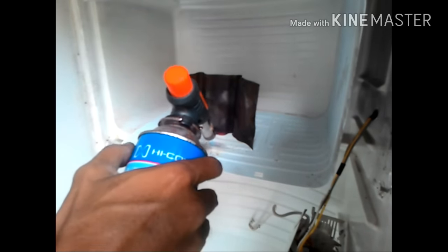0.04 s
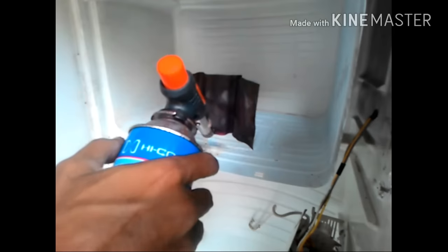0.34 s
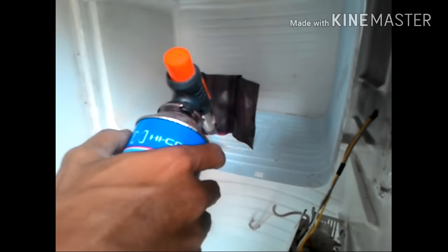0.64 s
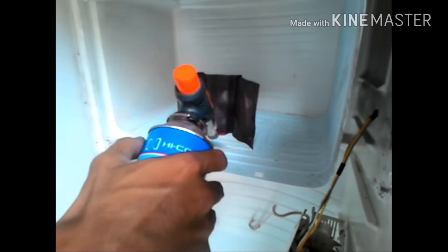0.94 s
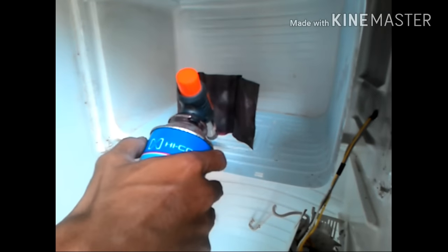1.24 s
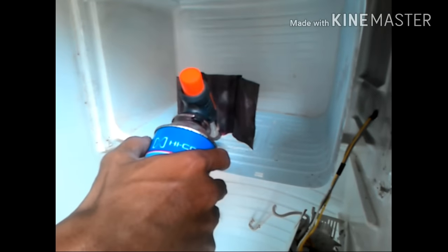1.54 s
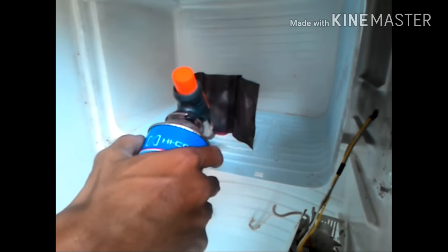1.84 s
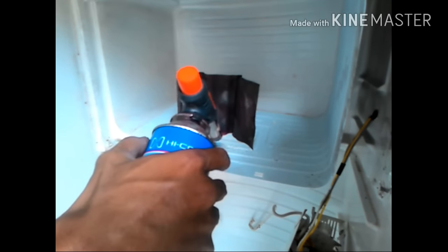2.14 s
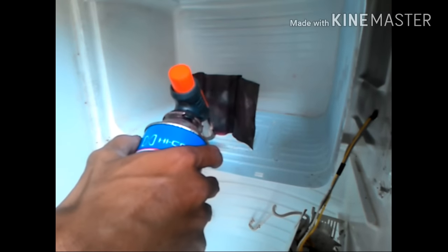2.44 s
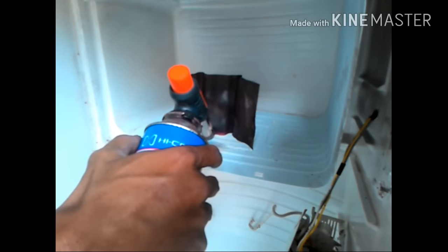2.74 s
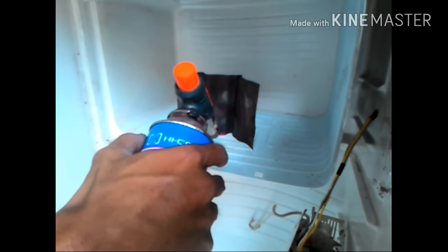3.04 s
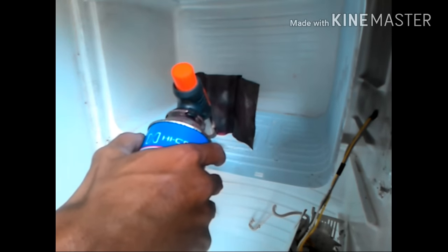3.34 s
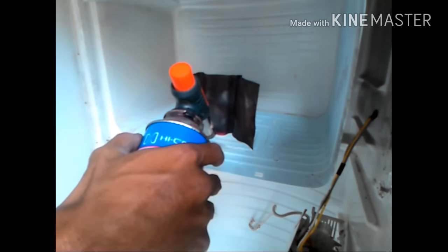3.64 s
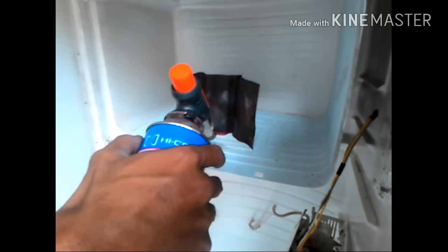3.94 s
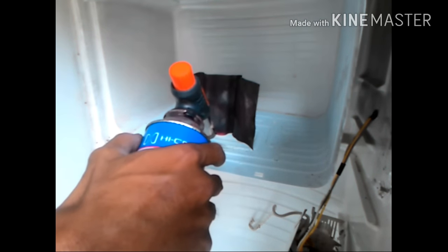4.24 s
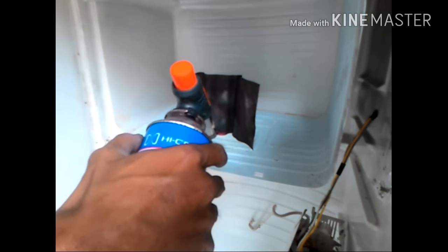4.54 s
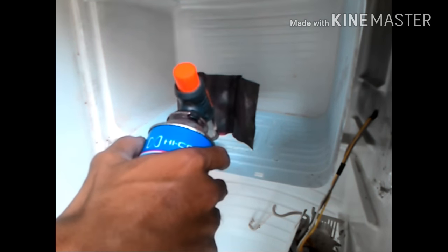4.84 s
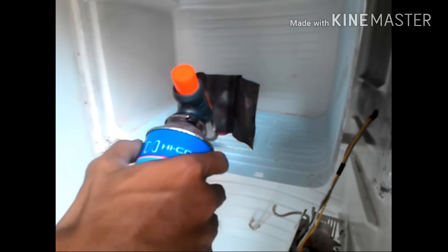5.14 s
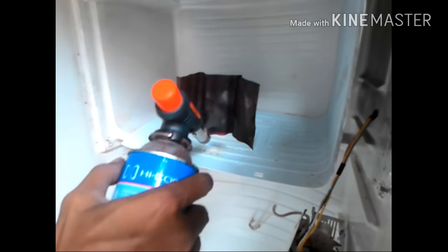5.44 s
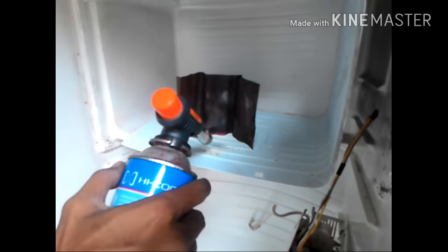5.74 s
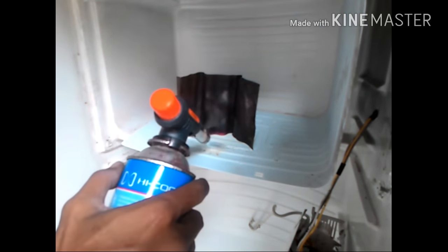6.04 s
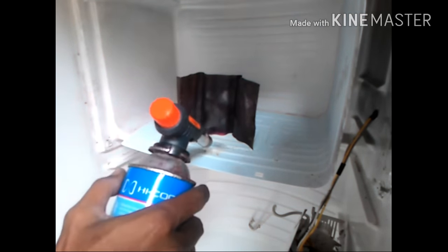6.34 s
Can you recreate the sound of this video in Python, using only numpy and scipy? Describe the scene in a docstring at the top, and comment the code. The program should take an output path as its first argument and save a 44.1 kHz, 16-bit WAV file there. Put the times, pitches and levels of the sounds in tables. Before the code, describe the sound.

A handheld gas torch hisses steadily up close, its flame flaring into short, hollow, fluttering roars against metal inside a refrigerator.

```python
"""Butane torch inside an empty refrigerator

A handheld torch heats a thin metal patch, close to a stereo camera's two microphone ports.
The gas jet hisses steadily through the burner tube, its colour shifting as the hand sways.
The flame flares into a roar on the metal and rings the air modes of the plastic cabinet,
with hollow puffs and a faint rumble beneath. Near the end the torch is lowered."""
import sys
import numpy as np
from scipy import signal
from scipy.fft import rfft, irfft, next_fast_len
from scipy.io import wavfile
from scipy.ndimage import map_coordinates

SR = 44100
rng = np.random.default_rng(int(sys.argv[2]) if len(sys.argv) > 2 else 0)


def transcribe(u):
    """Save the signal u as a 16-bit wav file named by the first command-line argument.

    u: samples, shape (n,) or (channels, n), limited to [-1, 1]; the rate is SR.
    q: integer samples, one column per channel.
    """
    v = np.clip(np.atleast_2d(u).T, -1, 1)
    q = np.round(v * 32767).astype(np.int16)
    wavfile.write(sys.argv[1], SR, q)


N = 290178
TIME = np.arange(N) / SR
FFT_SIZE = next_fast_len(N + 8192)
FREQ = np.fft.rfftfreq(FFT_SIZE, 1 / SR) + 1e-3

# hollow puffs of the flame: t/s, swell width/s, f/Hz, level/dB
PUFF_NOTES = [(0.955, 0.022, 109.6, -28), (1.039, 0.014, 234.6, -17), (1.111, .018, 236, -22),
              (1.25, 0.025, 232.6, -21), (1.45, 0.041, 115.5, -23), (1.336, 0.013, 330, -23),
              (2.475, 0.014, 310, -21), (2.524, 0.02, 164, -17.5), (2.65, 0.011, 105.8, -25.5),
              (2.77, .022, 240, -20), (3.175, .022, 110.3, -25), (3.292, 0.027, 162, -23),
              (3.895, 0.021, 235.5, -26.5), (4.042, .018, 437, -31), (4.055, 0.019, 266, -17),
              (4.1, 0.01, 252, -20), (4.446, 0.018, 270, -34), (5.617, 0.023, 255, -23),
              (5.22, 0.017, 103.8, -32.5), (5.745, 0.019, 247, -27), (5.993, 0.054, 251, -33),
              (6.19, 0.012, 110, -27), (6.236, 0.064, 255, -25)]


def amp(db):
    """Decibels to gain."""
    return 10 ** (np.asarray(db) / 20)


def unit(x):
    """x at rms 1."""
    return x / np.sqrt(np.mean(x ** 2) + 1e-20)


def curves(rows):
    """One automation curve for each column after the time."""
    times, *columns = np.transpose(rows)
    return [np.interp(TIME, times, column) for column in columns]


def swell(at_s, width_s):
    """A bell-shaped rise and fall; width_s is its standard deviation."""
    return np.exp(-.5 * np.minimum(np.abs(TIME - at_s) / width_s, 10) ** 2)


def wobble(rate):
    """A smooth random curve, rate knots a second."""
    coarse = TIME[::32]
    drift = map_coordinates(rng.standard_normal(4096), [coarse * rate], mode="wrap")
    return np.interp(TIME, coarse, drift)


def white(size=len(FREQ)):
    """Complex white noise, by default one full spectrum of it."""
    return rng.standard_normal(size) + 1j * rng.standard_normal(size)


def band(low_hz, high_hz, order):
    """Gain of a band-pass; order is the steepness of its (lower, upper) edge."""
    return ((1 + (low_hz / FREQ) ** (2 * order[0])) * (1 + (FREQ / high_hz) ** (2 * order[1]))) ** -.5


def bell_eq(x, hz, width_hz, db):
    """Boost or cut one band of x along a curve in dB."""
    bell = 2 ** -(2 * (FREQ - hz) / width_hz) ** 2
    part = irfft(rfft(x, FFT_SIZE) * bell, FFT_SIZE)[:, :N]
    return x + (amp(db) - 1) * part


def crossfade(a, b, share):
    """Equal-power fade from a (share 0) to b (share 1)."""
    return np.sqrt(1 - share) * a + np.sqrt(share) * b


def rush(colour, diffuse_db, lag_ms):
    """Stereo noise of rms 1: a direct part that reaches the left port late, and a diffuse part."""
    hz, db = np.transpose(colour)
    tone = amp(np.interp(np.log(FREQ), np.log(hz), db))
    delay = np.exp(-2j * np.pi * FREQ * lag_ms / 1000)
    direct = white()
    pair = np.array([direct * delay, direct]) + amp(diffuse_db) * np.array([white(), white()])
    return unit(irfft(pair * tone, FFT_SIZE)[:, :N])


def resonate(modes, drive):
    """Turbulence of colour drive excites modes, each with its own stereo level and phase; rms 1."""
    hz, width, left_db, right_db, phase = np.transpose(modes)
    f = FREQ[:, None]
    power = 1 / (1 + ((hz ** 2 - f ** 2) / (f * width)) ** 2) ** 2
    left_power, right_power = power @ amp(left_db) ** 2, power @ amp(right_db) ** 2
    cross_power = power @ (amp(left_db + right_db) * np.exp(1j * phase))
    # the right port shares part of the left port's sound; the rest is its own
    shared = cross_power / np.sqrt(left_power)
    own = np.sqrt(np.abs(right_power - np.abs(shared) ** 2))
    common = white()
    pair = np.array([np.sqrt(left_power) * common, shared * common + own * white()])
    return unit(irfft(pair * drive, FFT_SIZE)[:, :N])


def beamed(hz, width_hz, left_db, right_db, phase):
    """A narrow, noisy ring that follows the curve hz and reaches the ports at unequal level and phase."""
    eddies = signal.sosfilt(signal.butter(2, width_hz / 2, fs=SR, output="sos"), white(len(hz)))
    ring = eddies / np.std(eddies.real) * np.exp(2j * np.pi * np.cumsum(hz) / SR)
    return np.real([amp(left_db) * ring, amp(right_db) * np.exp(1j * phase) * ring])


def sway(x, depth_db, width_hz, life_s):
    """Standing waves shift as the hand sways: bands cancel deeply but swell only a little; rms 1."""
    hz, times, spectra = signal.stft(x, SR, nperseg=2048)
    grid = np.meshgrid(hz / width_hz, times / life_s, indexing="ij")
    field = map_coordinates(rng.standard_normal((512, 128)), grid, mode="wrap")
    gain = amp(depth_db * np.minimum(field, np.tanh(field)))
    # hold each port's total power even while its colour moves
    colour = np.mean(np.abs(spectra) ** 2, axis=2, keepdims=True)
    total = np.sum(colour * gain ** 2, axis=1, keepdims=True) / np.sum(colour, axis=1, keepdims=True)
    _, swayed = signal.istft(spectra * gain / np.sqrt(total), SR, nperseg=2048)
    return unit(swayed[:, :N])


def rumble(pose, roar, still_db=-63, handling_db=-46, flare_db=-30, lumps_db=4):
    """A faint, lumpy low bed, stronger under flares and while the torch is lowered."""
    # rumble spectrum: f/Hz, relative level/dB
    colour = [(12, 3), (30, -39), (65, 14), (110, 1), (600, -7), (4000, -62)]
    gain = np.sqrt(amp(still_db) ** 2 + pose * amp(handling_db) ** 2 + (amp(flare_db) * roar) ** 2)
    return gain * amp(lumps_db * wobble(6.7)) * rush(colour, diffuse_db=-3, lag_ms=.05)


def wash(roar, flare_db=-17):
    """Soft air between roar and hiss: it grows as the jet spills past the patch, and with each flare."""
    # spectrum of the airy band: f/Hz, relative level/dB
    colour = [(300, -10), (1500, 10.5), (2200, 2.5), (2600, 11.5), (3150, 10), (3400, 20), (3700, -9.5),
              (4300, -56), (8000, -66)]
    # spill past the patch: t/s, level/dB
    spill = [(0, -41), (.15, -44), (.35, -37.5), (.48, -41), (.8, -30), (1.2, -35), (1.75, -44), (2.1, -42),
             (2.8, -39), (3.05, -45), (3.25, -37), (3.6, -42), (4.1, -40), (4.7, -45), (5.35, -41),
             (5.7, -31), (5.9, -38), (6.3, -31.5), (6.58, -33)]
    air = rush(colour, diffuse_db=-4.5, lag_ms=.22)
    air = sway(air, depth_db=5, width_hz=120, life_s=.1)
    return np.hypot(amp(curves(spill)[0]), amp(flare_db) * roar) * air


def whistle():
    """The burner tube's thin ring stands out on the right while aimed, and sinks as the aim drifts."""
    # pitch and level of the ring: t/s, f/Hz, level/dB
    ring_path = [(1.0, 4870, -43), (1.25, 4880, -24.5), (1.7, 4910, -21.5), (1.9, 4895, -25),
                 (2.2, 4925, -21), (2.45, 4895, -26), (2.7, 4865, -22.5), (3.1, 4915, -25),
                 (3.55, 4895, -27), (4.1, 4890, -24.5), (4.7, 4860, -46), (5.6, 4840, -38),
                 (5.8, 4840, -70)]
    hz, db = curves(ring_path)
    return amp(db) * beamed(hz, width_hz=70, left_db=-12, right_db=0, phase=-1.77)


def sizzle():
    """Lobes of the jet's beam sweep past the ports as the hand sways, each a narrow swell of noise."""
    # passing lobes: t/s, swell width/s, f/Hz, bandwidth/Hz, left/dB, right/dB, right phase lead/rad
    lobes = [(.05, 0.092, 4670, 80, -28, -31, 0), (0.253, 0.25, 8500, 180, -20, -42, -2.4),
             (0.448, .12, 4030, 69.6, -27, -34, -0.3), (0.756, 0.2, 5060, 120, -33, -32, -1.5),
             (0.78, .14, 8280, 180, -23.5, -37, 1.3), (.8, .17, 4230, 95, -28.5, -29, 0.96),
             (0.852, 0.18, 4610, 80, -32, -33, 0), (1.169, .12, 8360, 160, -28, -34, -1.6),
             (1.25, .13, 7800, 200, -36, -36, 1.3), (2.04, 0.089, 8410, 160, -23, -35, -1.3),
             (2.099, .13, 3920, 90, -42, -30.5, 0.92), (2.149, .1, 5080, 90, -33, -28, -0.73),
             (2.482, 0.098, 8710, 220, -20.5, -31, -1), (2.85, .12, 8430, 180, -24.5, -35, -1.2),
             (3.242, 0.13, 7920, 220, -23, -35, 1.7), (3.45, .15, 8380, 200, -25, -35, -1.8),
             (4.451, 0.16, 8680, 240, -25.5, -22, 0.86), (4.604, 0.37, 11150, 350, -40, -35, 0.4),
             (4.851, 0.4, 4756, 99, -25.5, -39, 0.84), (4.951, 0.38, 4930, 80, -23.5, -37, -1.6),
             (5.051, 0.2, 8630, 200, -23, -26, 0.89), (5.098, .25, 4106, 60, -27.5, -37, 0.57),
             (5.707, .09, 4060, 110, -26, -29, 1), (5.745, 0.13, 4660, 110, -32, -36, 1.8),
             (5.803, 0.12, 5100, 80, -30, -35.5, 0), (6.246, .2, 4820, 110, -26, -28, 2),
             (6.306, .1, 4020, 100, -22, -24, 0.5)]
    out = np.zeros((2, N))
    for at_s, width_s, hz, width_hz, left_db, right_db, phase in lobes:
        gain = swell(at_s, width_s)
        heard = np.flatnonzero(gain > .01)
        ring = beamed(np.full(len(heard), hz), width_hz, left_db, right_db, phase)
        out[:, heard] += gain[heard] * ring
    return out


def tube_hiss(pose, roar, level_db=-21.5, lowered_db=2.5, flare_boost=2.1):
    """Gas hisses through the burner tube; with the torch lowered, the hiss swells with each flare."""
    # hiss resonances with the torch held close, aimed at the patch and lowered:
    # f/Hz, bandwidth/Hz, relative left/dB, relative right/dB, right phase lead/rad
    close_modes = [(3709, 336, -12.1, -11.6, -0.1), (3872, 45, -17.2, -17.8, -2.9),
                   (4051, 178, -3.9, -8.5, 0.1), (4205, 82, -4.5, -15.2, 1.7),
                   (4322, 519, -12.3, -4.5, 1.9), (4573, 96, -2.3, -10.0, -0.7),
                   (4673, 136, -2.8, -4.0, -2.1), (4882, 175, -2.2, -7.9, 1.6),
                   (5080, 138, 0.0, -6.0, -1.2), (5222, 365, -12.9, -8.1, 2.6),
                   (5614, 437, -10.1, -14.6, -2.6), (5977, 77, -11.8, -17.6, -0.9),
                   (6096, 519, -17.0, -13.3, 0.3), (6477, 306, -13.5, -8.7, -1.4)]
    aimed_modes = [(3578, 479, -17.1, -20.6, -0.7), (3890, 160, -17.2, -9.4, 0.8),
                   (4109, 133, -7.4, -14.3, 0.1), (4235, 82, -8.7, -12.9, 0.1),
                   (4373, 197, -9.9, -20.1, 1.4), (4521, 479, -17.0, -18.3, -2.7),
                   (4671, 84, -17.3, -6.9, -2.4), (4753, 216, -9.7, -36.6, 2.4),
                   (4897, 105, -22.5, -4.0, -1.7), (4986, 163, -13.0, -19.6, -1.5),
                   (5125, 121, -12.5, -17.2, 0.2), (5302, 202, -10.7, -8.5, -3.1),
                   (5625, 252, -12.9, -13.2, -2.1), (5953, 479, -19.8, -15.9, 0.8),
                   (6165, 405, -18.9, -16.1, -1.6), (6437, 479, -15.8, -16.2, 0.5)]
    lowered_modes = [(3628, 430, -13.7, -17.8, -0.1), (3866, 56, -13.7, -14.8, -0.2),
                     (4018, 143, -3.2, -4.4, 0.3), (4227, 479, -11.7, -13.4, 1.1),
                     (4407, 479, -28.1, -10.6, -2.3), (4664, 102, 0.0, -11.1, 1.1),
                     (4785, 122, -2.9, -2.3, 2.0), (4959, 62, -8.3, -12.2, 1.1),
                     (5135, 152, -6.5, -16.1, -2.9), (5334, 106, -14.1, -15.7, -0.6),
                     (5549, 215, -11.3, -12.9, -1.9), (5836, 178, -16.9, -24.4, -1.0),
                     (6138, 479, -16.6, -14.6, 0.2), (6471, 479, -18.0, -17.7, -2.0)]
    drive = band(3490, 6370, order=(12, 12))
    close, aimed, lowered = (resonate(m, drive) for m in (close_modes, aimed_modes, lowered_modes))
    settle_at_s, settle_s = 1.15, .3  # the hand settles on its aim
    settled = np.clip((TIME - settle_at_s) / settle_s + .5, 0, 1)
    hiss = crossfade(close, crossfade(aimed, lowered, pose), settled)
    hiss = sway(hiss, depth_db=5, width_hz=42, life_s=.2)
    return hiss * amp(level_db + lowered_db * pose) * (1 + flare_boost * pose * roar)


def nozzle_fizz(pose, level_db=-21, lowered_db=-.5, flicker_db=.73):
    """The gas excites the high resonances of nozzle and burner tube: a bright, flickering top end."""
    # high resonances: f/Hz, bandwidth/Hz, relative left/dB, relative right/dB, right phase lead/rad
    modes = [(6629, 786, -12.8, -10.1, -0.8), (7093, 424, -7.1, -12.6, 2.4), (7353, 160, -13.8, -7.1, -0.8),
             (7856, 962, -20.6, -7.5, -3.1), (7987, 451, -1.6, -27.6, 1.8), (8388, 184, 0.0, -15.0, 1.7),
             (8597, 306, -1.9, -4.0, -2.0), (8685, 531, -4.8, -5.1, 0.5), (9234, 1319, -14.8, -20.2, -2.9),
             (10018, 1319, -31.3, -15.2, 0.7), (10897, 1319, -20.0, -18.3, -2.9),
             (11183, 739, -17.3, -10.5, -0.1), (11502, 1319, -21.4, -19.7, 3.1),
             (12687, 401, -22.5, -20.1, -0.7), (13894, 1319, -25.4, -19.7, 1.1),
             (14102, 1319, -23.9, -20.3, -2.1)]
    fizz = resonate(modes, band(6830, 14800, order=(12, 12)))
    fizz = sway(fizz, depth_db=2, width_hz=700, life_s=.07)  # broad lobes of the beam
    fizz = sway(fizz, depth_db=6, width_hz=50, life_s=.14)  # fine standing waves
    return fizz * amp(level_db + lowered_db * pose + flicker_db * wobble(45))


def jet(pose, roar, tremble_db=.45):
    """Hiss and fizz tremble with the gas flow; the echo off the walls cancels a band now and then."""
    # passing notches: t/s, swell width/s, f/Hz, bandwidth/Hz, depth/dB
    nulls = [(0.78, 0.16, 8560, 520, -10), (0.81, 0.16, 7780, 400, -1), (1.55, 0.16, 4700, 150, -2),
             (1.6, .33, 4670, 190, -2), (1.65, 0.49, 8640, 350, -4.5), (4, 0.64, 4200, 260, -2),
             (2.15, .12, 4150, 260, -7), (6.3, .4, 8800, 400, -0.5)]
    gas = tube_hiss(pose, roar) + nozzle_fizz(pose)
    gas *= amp(tremble_db * wobble(35))
    for at_s, width_s, hz, width_hz, db in nulls:
        gas = bell_eq(gas, hz, width_hz, db * swell(at_s, width_s))
    return gas


def puffs(waver_hz=7):
    """The flame briefly locks to one air mode: a hollow, wavering note in the centre."""
    out = np.zeros(N)
    for at_s, width_s, hz, db in PUFF_NOTES:
        phase = 2 * np.pi * np.cumsum(hz + waver_hz * wobble(60)) / SR
        out += amp(db) * swell(at_s, width_s) * np.sqrt(2) * np.sin(phase)
    return out


def flares(attack_s=.058, release_db_per_s=163, tail_s=.5):
    """Envelopes of the deep and upper roar: each flare catches, holds and dies over the calm flame."""
    # the flame between flares: t/s, level/dB
    calm = [(0, -33.5), (3.5, -31.5), (4.7, -41.5), (5.4, -35), (6.58, -34)]
    # flares on the metal: t/s, time until release/s, deep level/dB, upper over deep/dB
    bursts = [(-.05, 0.088, -15.5, -1.5), (0.155, 0.2, -30, 3.5), (0.744, .1, -31.5, 4.5),
              (0.806, 0.16, -27.5, 8), (0.964, 0.374, -23, 2.8), (1.318, 0.16, -20, -2),
              (1.507, 0.19, -20, -4), (1.85, 0.17, -31.5, -4.5), (2.278, 0.12, -29, 1),
              (2.419, 0.096, -19.5, 2), (2.569, 0.17, -14, -3.5), (2.74, 0.069, -20, -2),
              (2.826, 0.074, -27, -3), (3.134, 0.11, -19, 1), (3.228, 0.13, -15.5, -1.5),
              (3.32, 0.079, -26, -8), (3.786, 0.052, -26, 1.5), (4.003, 0.11, -23, 0.5),
              (4.128, 0.05, -23, -1.5), (4.412, 0.029, -20, 0.5), (4.752, 0.07, -37, 9),
              (5.009, 0.11, -30.5, 2.5), (5.135, 0.032, -41, 14), (5.51, 0.052, -22, -4.5),
              (5.566, 0.16, -19.5, -1), (5.921, 0.084, -24, -4), (6.127, 0.2, -21, -2.5),
              (6.347, 0.15, -31, 2)]
    deep_power = amp(curves(calm)[0]) ** 2
    upper_power = deep_power.copy()
    for start_s, length_s, db, bright_db in bursts:
        span = slice(*np.searchsorted(TIME, [start_s, start_s + length_s + tail_s]))
        age = TIME[span] - start_s
        attack = np.minimum(age / attack_s, 1)
        gain = attack * amp(db - release_db_per_s * np.maximum(age - length_s, 0))
        deep_power[span] += gain ** 2
        upper_power[span] += (gain * amp(bright_db)) ** 2
    return np.sqrt(deep_power), np.sqrt(upper_power)


def cabinet(modes, pose):
    """The cabinet's air modes ring in a balance that depends on where the flame sits."""
    aimed = [mode[:5] for mode in modes]
    lowered = [(hz, width, left + change, right + change, phase)
               for hz, width, left, right, phase, change in modes]
    drive = band(40, 2000, order=(2, 14))
    return crossfade(resonate(aimed, drive), resonate(lowered, drive), pose)


def flame(pose, deep_gain, upper_gain, split_hz=480, deep_db=-3, upper_db=-.3):
    """The flame flutters on the metal and drives the cabinet's air into a roar, mostly below 2 kHz."""
    # cabinet air modes: f/Hz, bandwidth/Hz, relative left/dB, relative right/dB,
    # right phase lead/rad, change with the torch lowered/dB
    air_modes = [(60, 23, -17.3, -15.2, 0.1, 5), (111, 32, -4.6, -3.0, 0.1, 1), (167, 32, -2.7, 0, 0.1, -1),
                 (237, 54, -0.5, 0, 0.1, 3), (287, 28, -2, -2.5, 0.1, -1), (316, 52, -3.2, -4.5, 0.5, -1),
                 (399, 38, -8, -6.6, 0.3, -3), (450, 88, -12.8, -12.3, 0.4, -3),
                 (502, 50, -7.8, -12, 0.2, -3), (618, 55, -7.8, -13, 0.2, 0), (699, 64, -7.7, -11, 1.8, 1),
                 (739, 25, -5.9, -17.3, -3.1, -1), (777, 52, -31.7, -6.4, -0.2, 1),
                 (847, 45, -5.7, -11.4, 1.4, 2), (894, 24, -8.8, -11.2, -2.2, 1),
                 (938, 88, -21.1, -6.4, -0.3, -2), (1013, 58, -4, -6.4, 1.0, -3),
                 (1053, 50, -11.7, -5.8, 1.5, -5), (1106, 44, -6.1, -11.0, 3.0, 3),
                 (1189, 85, -12.1, -12.8, 2.2, 3), (1265, 56, -4.4, -26.6, 1.9, -1),
                 (1334, 64, -20.7, -11.9, -2.5, 4), (1450, 58, -3.8, -10, 0.5, 2.5),
                 (1612, 70, -4.7, -18, 1.2, -2), (1703, 244, -19.6, -13.9, -1.5, -2),
                 (1840, 202, -8.5, -11.5, 2.1, -3), (1992, 244, -15.5, -15, 3.1, -2)]
    # boost or cut of the clearest ring, and of the lowest modes: t/s, gain/dB
    ring_ride = [(0, 2), (.15, -3), (.45, -1), (.9, -5), (1.25, -1), (1.6, -4), (2.25, -5), (2.5, -1),
                 (3.3, -2), (3.85, 0), (4.45, -3), (4.8, -1), (5.5, -3), (6, -1), (6.58, 1)]
    bass_ride = [(0, 0), (1, 3), (1.45, -0.5), (2.2, -3), (2.65, -3), (2.85, 1.5), (3.3, 0), (3.6, -5),
                 (4.05, -3), (4.45, 1.5), (5, 1), (5.6, 1.5), (6.2, -3.5), (6.58, 0)]
    # brief gaps in the flame: t/s, swell width/s, gain/dB
    gaps = [(1.852, 0.015, -7), (2.942, 0.015, -5.5), (3.975, 0.023, -6.5), (4.387, .02, 0.5),
            (5.475, .015, -6)]
    surge_db, flutter_db, puff_lift_db = 1.1, 1.13, 1
    deep = cabinet([mode for mode in air_modes if mode[0] < split_hz], pose)
    upper = cabinet([mode for mode in air_modes if mode[0] >= split_hz], pose)
    upper = sway(upper, depth_db=5, width_hz=70.1, life_s=.07)
    upper = bell_eq(upper, hz=1450, width_hz=110, db=curves(ring_ride)[0])
    upper *= upper_gain * amp(upper_db)
    deep = bell_eq(deep, hz=115, width_hz=150, db=curves(bass_ride)[0])
    puffing = sum(swell(at_s, width_s) for at_s, width_s, _, _ in PUFF_NOTES)
    deep *= deep_gain * amp(deep_db + puff_lift_db * puffing + surge_db * wobble(22))
    gap_db = sum(db * swell(at_s, width_s) for at_s, width_s, db in gaps)
    return amp(gap_db + flutter_db * wobble(70)) * (deep + upper)


def scene():
    """Flame, gas and rumble in stereo, led by the flares and by how the torch is held."""
    # how the torch is held: t/s, pose (0 = aimed at the patch, 1 = lowered)
    hand_path = [(0, 0.13), (.45, 0.087), (.8, 0.28), (1.25, 0.076), (1.8, 0.0048), (4.3, 0.0069),
                 (5.38, 0.022), (5.62, 0.93), (6.58, 1)]
    pose = np.clip(curves(hand_path)[0], 0, 1)
    deep_gain, upper_gain = flares()
    gas = jet(pose, upper_gain) + sizzle() + whistle() + wash(upper_gain)
    return flame(pose, deep_gain, upper_gain) + puffs() + gas + rumble(pose, deep_gain)


def record(dry, ceiling=.92, top_hz=15300):
    """The camera rounds off the highest peaks and keeps nothing above its band limit."""
    soft = dry / (1 + np.abs(dry / ceiling) ** 8) ** (1 / 8)
    return irfft(rfft(soft, FFT_SIZE) * (FREQ < top_hz), FFT_SIZE)[:, :N]


dry = scene()
out = record(dry)
transcribe(out)
```